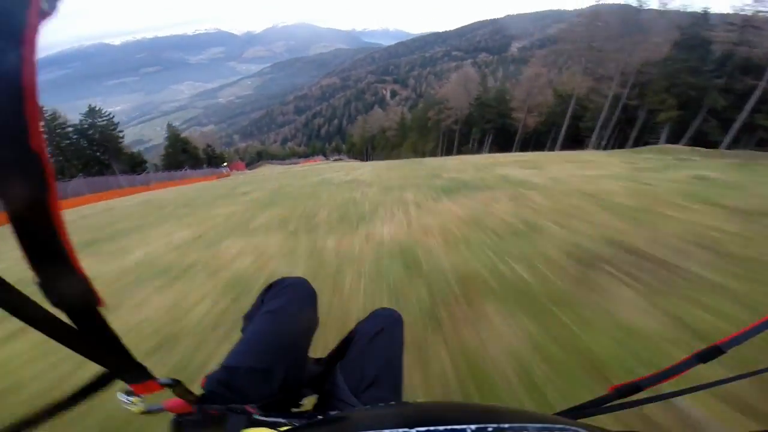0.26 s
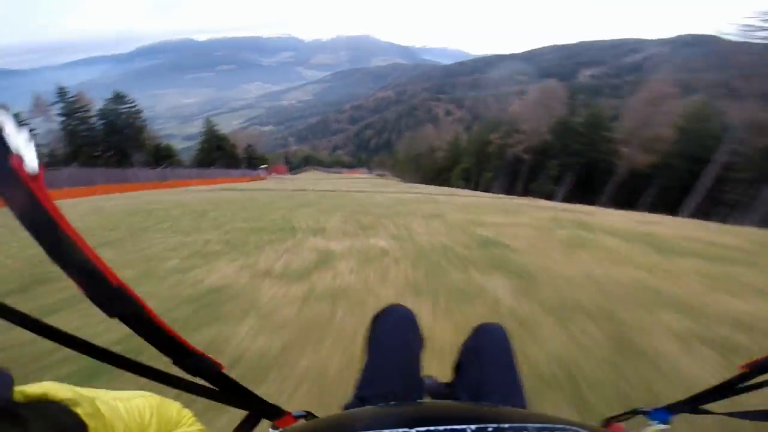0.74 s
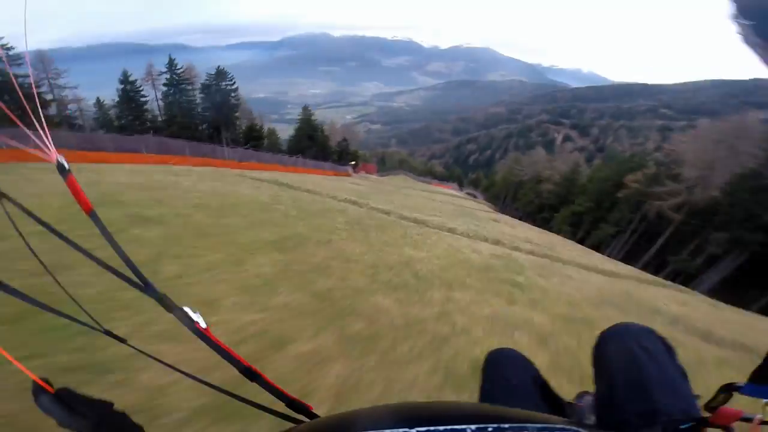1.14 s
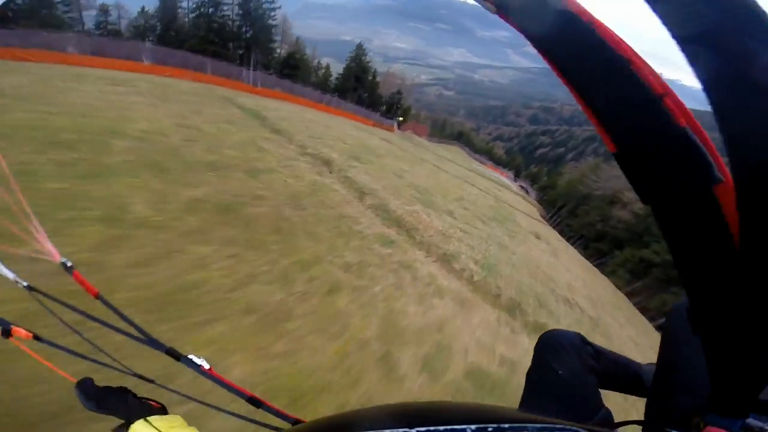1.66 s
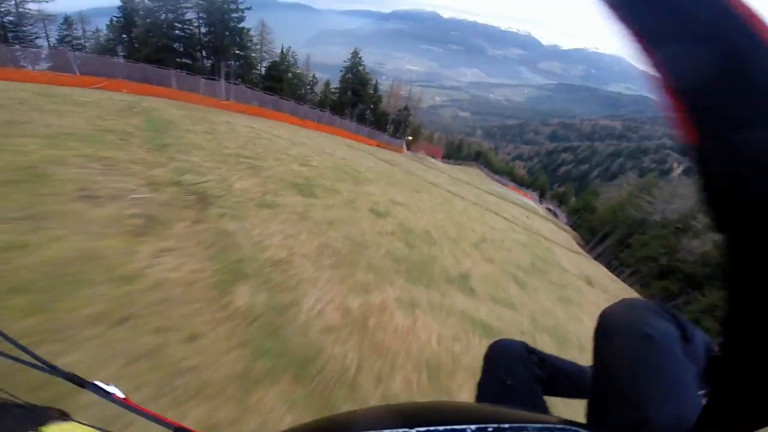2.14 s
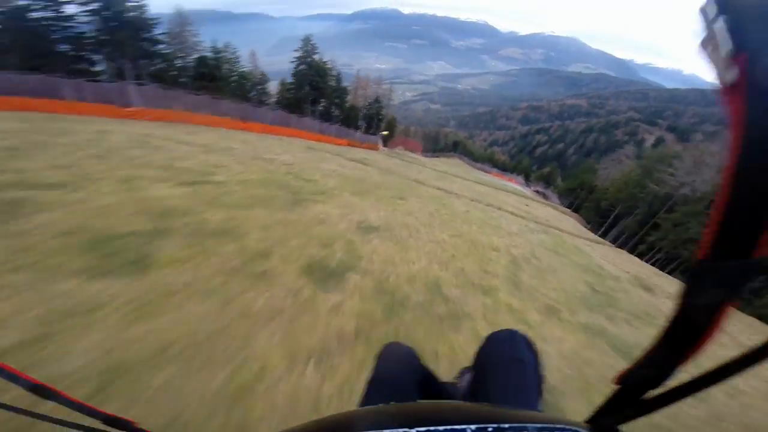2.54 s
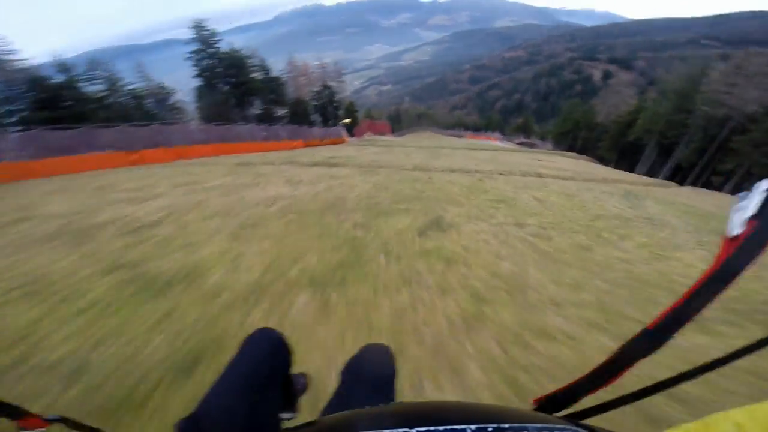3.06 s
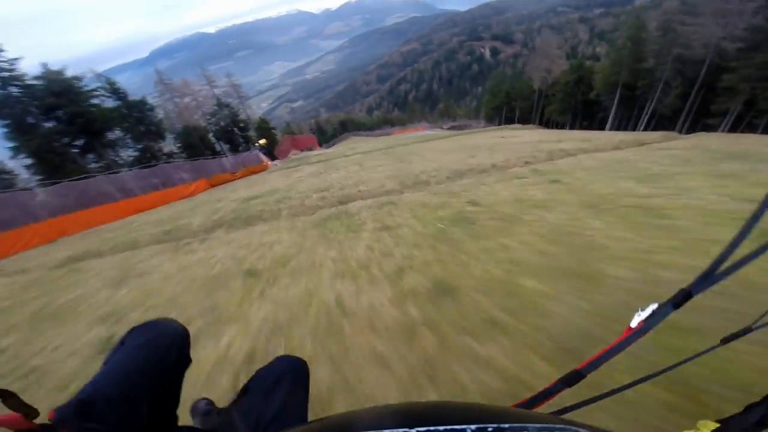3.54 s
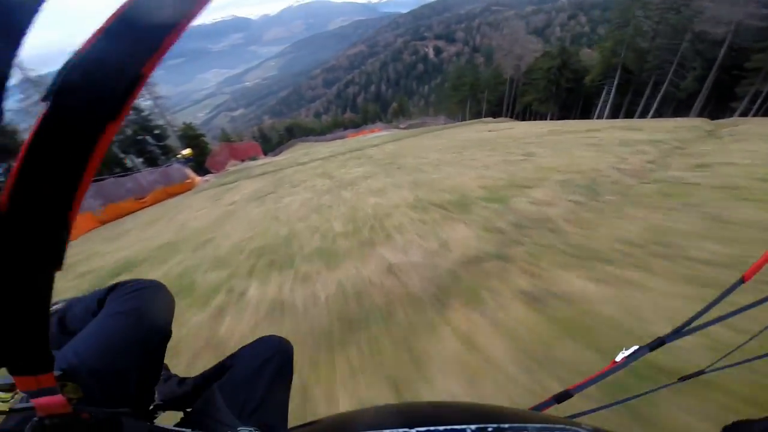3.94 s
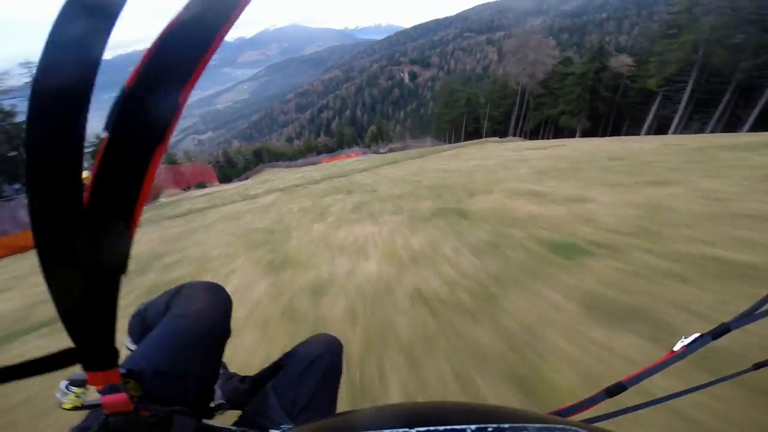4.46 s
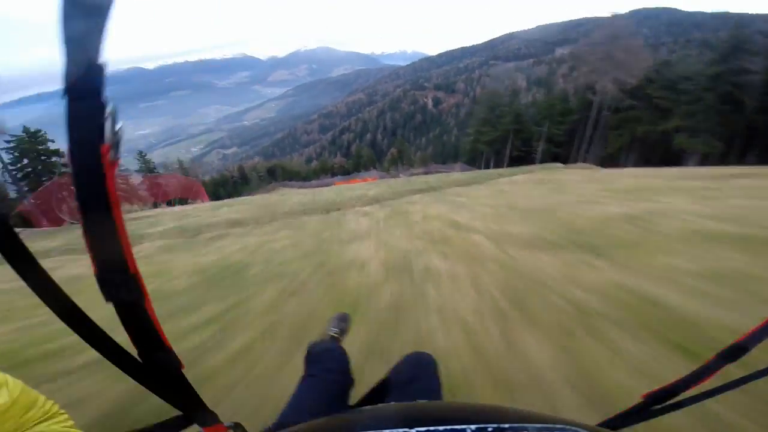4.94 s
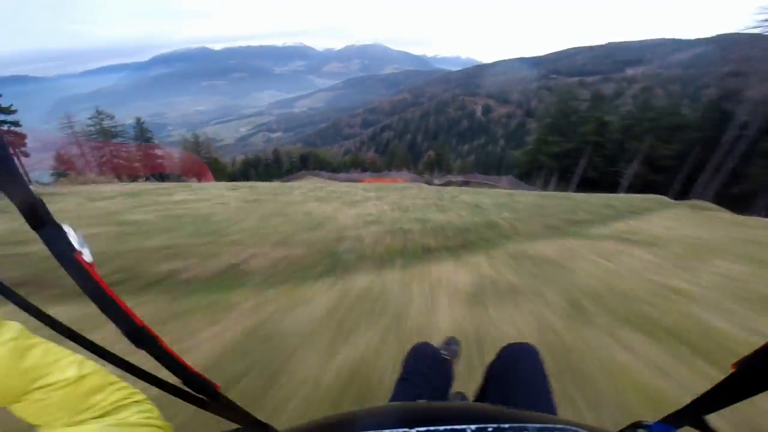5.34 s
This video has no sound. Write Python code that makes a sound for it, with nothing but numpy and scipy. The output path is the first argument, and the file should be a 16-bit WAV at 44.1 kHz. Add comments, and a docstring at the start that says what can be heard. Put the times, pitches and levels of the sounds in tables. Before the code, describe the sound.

Fast air tears across a small enclosed microphone during a low flight down an open meadow. The coarse, hollow, resonant roar drops, turns hissy, then surges back halfway, fluttering throughout. Soft low thuds of eddies lie beneath, a smooth hiss behind. Noisy whistles dip briefly at three moments and rigging ticks once. Very close mono sound, dull at the very top.

```python
"""A grass slope, skimmed fast and low under a wing with a small cased camera.
Turbulent air scrubs over the case: noise rung by the case's cavities, swelling and changing colour.
Slow eddies buffet the microphone membrane as three low noises; air hisses further off as smooth noise.
A gap whistles now and then, a noisy sliding tone, and a piece of rigging ticks once, a few struck modes."""
import sys
import numpy as np
from scipy import signal
from scipy.fft import rfft, irfft, next_fast_len
from scipy.io import wavfile

SR = 44100
rng = np.random.default_rng(int(sys.argv[2]) if len(sys.argv) > 2 else 0)


def inscribe(sig):
    """Save sig as 16-bit PCM at rate SR to the path in sys.argv[1].

    A 1-D sig is mono; a 2-D sig holds one channel per row.
    Samples are clipped to [-1, 1] before scaling.
    """
    pcm = np.round(np.clip(np.atleast_2d(sig).T, -1, 1) * 32767)
    wavfile.write(sys.argv[1], SR, pcm.astype(np.int16))


N = 246519   # samples, about 5.6 s


def from_db(db):
    """Amplitude factor of a level in dB."""
    return 10 ** (np.asarray(db) / 20)


def rms_one(x):
    """Scale to an RMS of one."""
    return x / np.sqrt(np.mean(x ** 2) + 1e-20)


def in_time(rows):
    """Draw each column of a table as a smooth fader move over the time in its first column."""
    seconds, *columns = np.transpose(rows)
    return [np.interp(np.arange(N) / SR, seconds, column) for column in columns]


def drift(corner_hz):
    """Slow chance: noise at every 20th sample through a double one-pole low-pass; spread 1."""
    pole = np.exp(-40 * np.pi * corner_hz / SR)
    noise = rng.standard_normal(N // 20 + 4002)
    slow = signal.lfilter([1], [1, -2 * pole, pole * pole], noise)[4000:]   # skip the settling
    return np.interp(np.arange(N) / 20, np.arange(len(slow)), rms_one(slow - slow.mean()))


def log_hz():
    """Size of a padded transform and the log frequency of its every bin."""
    size = next_fast_len(N)
    return size, np.log(np.maximum(np.arange(size // 2 + 1) * SR / size, 1))


def coloured(spectrum):
    """Transform of a noise with the given spectrum, silent outside it."""
    size, at = log_hz()
    hz, level_db = np.transpose(spectrum)
    shape_db = np.interp(at, np.log(hz), level_db, left=-200, right=-200)
    return rfft(rng.standard_normal(size)) * from_db(shape_db)


def band_level(noise, low_hz, high_hz):
    """Strength of a noise within one band."""
    return np.std(signal.sosfilt(signal.butter(4, [low_hz, high_hz], "band", fs=SR, output="sos"), noise))


# Cavities and ports of the case. Each row: centre in Hz, width in Hz, lift in dB (negative is a notch).
CASE_RESONANCES = [(1349, 199, 13.5), (1493, 394, 7), (1976, 80, -5.5), (2284, 250, 3), (2522, 99, 7),
                   (2825, 380, -3.5), (3234, 470, 6), (3530, 725, 9), (4150, 224, -10), (4370, 200, 1),
                   (4770, 330, -5.5), (5567, 520, 12), (5770, 230, 2.5), (6536, 550, 9.5), (7460, 220, 5),
                   (8000, 250, 3), (8600, 560, -5), (11070, 420, 4.5)]


def through_case(x):
    """Cavities boost and cancel around their resonances: a chain of peaks and notches."""
    sections = []
    for hz, width_hz, lift_db in CASE_RESONANCES:
        a, w, damp = from_db(lift_db / 2), 2 * np.pi * hz / SR, np.pi * width_hz / SR
        zeros = [1 + damp * a, -2 * np.cos(w), 1 - damp * a]
        poles = [1 + damp / a, -2 * np.cos(w), 1 - damp / a]
        sections.append(np.array(zeros + poles) / poles[0])
    return signal.sosfilt(sections, x)


# Airflow over the case. Each row: time in seconds, level of the roar in dB, then its upper mids, treble
# and top hiss in dB relative to the roar; of these three only the swing about the mean is used.
AIRFLOW = [(0.0, -17.5, -5.5, -13, -32.0), (0.5, -16.5, -4.5, -12.5, -35), (0.68, -19.5, -3.5, -12, -33.0),
           (0.8, -25.0, 1.5, -8.5, -24.5), (1.25, -24.5, -1.5, -4.5, -21), (1.43, -26.5, 1, -3.5, -22.0),
           (1.6, -24.5, 1.5, -4.5, -21.5), (1.87, -22, -2.5, -10.5, -25.0), (1.92, -28, -3.5, -11.5, -32),
           (2.08, -25.5, -5.5, -9.5, -23), (2.15, -29, -3.5, -7.5, -26), (2.4, -22.5, -3.5, -5.5, -23),
           (2.5, -22.5, -5.5, -4.5, -26.5), (2.57, -14, -4.5, -13, -37.5), (2.9, -17.0, -3, -10, -28),
           (3.2, -15.5, -5, -11.5, -31.5), (3.45, -22, -3.5, -12, -27.0), (3.7, -16.5, -4, -10, -30.0),
           (3.85, -20.5, -2.5, -11, -27), (4.1, -18.0, -1.5, -8, -28.5), (4.6, -18.0, -4, -9, -31),
           (4.9, -21, 0.5, -6.5, -30.0), (5.13, -22.5, -10, -8.5, -28), (5.17, -26, -8, -8, -22.0),
           (5.31, -42, 4, 3.5, -13), (5.36, -18.5, -3, -6.5, -21), (5.59, -22.5, 0.5, -6.5, -21.5)]
# Centres of those four bands, in Hz.
AIRFLOW_BAND_HZ = [1450, 3100, 5900, 12000]
# Broad colour of the turbulence before the cavities. Each row: frequency in Hz, relative density in dB per Hz.
SCRUB_COLOUR = [(700, -22), (1000, -14), (1200, -5.5), (1900, 0.5), (2700, -4), (4200, -6.5), (5000, -10.5),
                (6900, -14), (7900, -21), (9500, -32), (10400, -26), (13400, -28.5), (14300, -42),
                (15300, -44), (16500, -45)]
FLUTTER_DB_PER_OCTAVE = 0.3063   # the flutter deepens above 1 kHz


def scrub(flutter, shared_db, fast_db, own_db):
    """Turbulence in overlapping bands; gusts and eddies shake all together, and each a little on its own."""
    size, at = log_hz()
    roar_db, *relative_db = in_time(AIRFLOW)
    # the spectra give the mean colour, the curves its swings
    swings_db = np.array([0 * roar_db] + [curve - curve.mean() for curve in relative_db])
    ringing = through_case(irfft(coloured(SCRUB_COLOUR), size))
    noise = rfft(ringing)
    noise /= band_level(irfft(noise, size), 1100, 2100)   # levelled in the roar band
    together_db = shared_db * drift(20.0) + fast_db * drift(124.0)

    centres, out = np.log(np.geomspace(1000, 14500, 13)), 0
    for k, centre in enumerate(centres):
        share = np.interp(at, centres, np.arange(len(centres)) == k)   # triangles that sum to one
        # blend the swings of the two nearest airflow bands
        place = np.interp(centre, np.log(AIRFLOW_BAND_HZ), np.arange(len(AIRFLOW_BAND_HZ)))
        low = min(int(place), len(AIRFLOW_BAND_HZ) - 2)
        level_db = swings_db[low] + (place - low) * (swings_db[low + 1] - swings_db[low])
        octaves = (centre - centres[0]) / np.log(2)
        level_db = level_db + FLUTTER_DB_PER_OCTAVE * octaves * flutter
        band = irfft(noise * share, size)[:N]
        out = out + band * from_db(level_db + together_db + own_db * drift(13.0))
    return from_db(roar_db) * out


# Slow eddies on the membrane. Each row: time in seconds, then thump, rumble and hollow mids in dB.
BUFFET_LEVELS = [(0.0, -31.0, -40, -40.5), (0.7, -31.5, -39, -46.0), (1.1, -29.5, -39.5, -43),
                 (1.45, -29, -41.5, -45), (1.62, -24, -35.5, -43), (1.77, -20.5, -32, -38),
                 (1.9, -30.5, -33.5, -42), (2.07, -17, -31.5, -38.5), (2.2, -28.5, -36.5, -44),
                 (2.45, -26.5, -32.5, -41.5), (2.65, -33, -37.5, -43.0), (2.8, -26, -34.5, -39.5),
                 (3.25, -32, -42, -45.5), (3.9, -31.5, -40, -43.5), (4.5, -34, -38.5, -43),
                 (4.65, -31.5, -37.5, -41.5), (4.85, -28.5, -33.5, -40), (5.12, -32, -41.5, -49.5),
                 (5.42, -24.5, -30, -39), (5.59, -28, -38.5, -42.5)]
# Colours of the three layers. Each row: frequency in Hz, relative density in dB per Hz.
THUMP_COLOUR = [(12, -42), (20, -12.5), (65, -7.5), (113, -1), (130, -0.5), (162, -11), (190, -24),
                (250, -41), (420, -120)]
RUMBLE_COLOUR = [(88, -33), (150, -15), (178, -4.5), (361, -4.5), (470, -14.5), (610, -24), (1030, -120)]
HOLLOW_COLOUR = [(380, -9.5), (480, -5), (650, -4), (900, -6.5), (1100, -4), (1400, -43)]


def buffet(lumpy_db):
    """Eddies push on the membrane: three low noise layers, each swelling as the eddies pass."""
    size, out = log_hz()[0], 0
    for colour, level_db in zip([THUMP_COLOUR, RUMBLE_COLOUR, HOLLOW_COLOUR], in_time(BUFFET_LEVELS)):
        layer = rms_one(irfft(coloured(colour), size)[:N])
        out = out + from_db(level_db + lumpy_db * drift(16.0)) * layer
    return out


# Steadier hiss on lines and clothing. Each row: time in seconds, level of its 9 kHz hump in dB.
AIR_LEVELS = [(0.0, -47.0), (0.35, -49), (0.7, -45), (1.45, -44.5), (1.7, -41.0), (1.92, -43.5), (2.5, -42),
              (2.6, -46.5), (3.2, -45), (3.55, -42.5), (3.8, -47), (4.1, -42.5), (4.9, -47), (5.2, -42.5),
              (5.4, -37), (5.59, -39.5)]
# Its colour. Each row: frequency in Hz, relative density in dB per Hz.
AIR_COLOUR = [(900, 7.5), (1500, 13.5), (2600, 15), (4500, -1.5), (7000, 3), (8000, -4), (8500, 6),
              (9500, 2), (10200, -6.5), (11100, -11), (12500, -21), (15100, -21)]


def air(flutter, flutter_db, flicker_db):
    """Air rushing past lines and clothing: smooth broad noise, levelled by its 9 kHz hump."""
    noise = irfft(coloured(AIR_COLOUR), log_hz()[0])[:N]
    noise /= band_level(noise, 8200, 9800)
    level_db = in_time(AIR_LEVELS)[0]
    return from_db(level_db + flutter_db * flutter + flicker_db * drift(20.0)) * noise


# Brief breathy whistles that slide down.
# Each row: start in seconds, length in seconds, first pitch in Hz, level in dB.
WHISTLES = [(0.622, .27, 7900, -36.5), (2.35, .22, 8000, -39.5), (4.871, .25, 6800, -33)]
SAG_HZ_PER_S2 = 23000   # the pitch falls ever faster
WHISTLE_EDGE_S = 0.033   # swell and fade


def whistle(breath_hz, waver_hz, overtone_db):
    """An unsteady edge tone: a narrow band of noise riding the pitch, with a faint overtone."""
    hz, gain = np.zeros(N), np.zeros(N)
    for start, length, first_hz, level_db in WHISTLES:
        t = np.arange(N) / SR - start
        envelope = np.clip(np.minimum(t, length - t) / WHISTLE_EDGE_S, 0, 1)
        hz += (envelope > 0) * (first_hz - SAG_HZ_PER_S2 * t ** 2)
        gain += from_db(level_db) * envelope
    phase = 2 * np.pi * np.cumsum(hz + waver_hz * drift(35.0)) / SR
    breath = drift(breath_hz) + 1j * drift(breath_hz)
    tone = np.exp(1j * phase) + from_db(overtone_db) * np.exp(2j * phase)
    return gain * np.real(breath * tone)


# Contact and two duller rebounds.
# Each row: time in seconds, strike level in dB, tilt in dB per octave above 3 kHz.
TICK_CONTACTS = [(2.1011, -6, -1), (2.1046, -9, -12), (2.1062, -11, -15)]
# What the tick rings with. Each row: frequency in Hz, relative level in dB, 60 dB decay time in seconds.
TICK_MODES = [(1240, -3.5, 0.016), (1910, -9, 0.011), (2440, -4, 0.015), (3040, -6, 0.013),
              (3480, -7, 0.0089), (4860, -6.5, 0.0084), (7000, -14, .006)]


def tick(soft_hz):
    """Each contact strikes every mode with its own strength; the case lets through no lows and few highs."""
    out = np.zeros(N)
    luck = rng.normal(0, 1.9, (len(TICK_CONTACTS), len(TICK_MODES)))   # dB
    for k, (hz, mode_db, t60) in enumerate(TICK_MODES):
        clicks = np.full(N, 1e-18)   # a trace of input keeps the decay from stalling the filter
        octaves = max(np.log2(hz / 3000), 0)
        for (seconds, strike_db, tilt_db), luck_db in zip(TICK_CONTACTS, luck[:, k]):
            clicks[round(seconds * SR)] = from_db(strike_db + mode_db + luck_db + tilt_db * octaves)
        r, w = from_db(-60 / (t60 * SR)), 2 * np.pi * hz / SR
        ring = signal.lfilter([0, np.sin(w)], [1, -2 * r * np.cos(w), r * r], clicks)
        out += (-1) ** k * ring   # neighbouring modes in opposite phase
    return signal.sosfilt(signal.butter(3, [1000, soft_hz], "band", fs=SR, output="sos"), out)


def scene():
    """All sources meet at one microphone."""
    flutter = drift(45)   # quick eddies that shake the treble and the far hiss alike
    wind = scrub(flutter, shared_db=0.69, fast_db=0.68, own_db=0.5)
    wind = wind + buffet(lumpy_db=0.7)
    wind = wind + air(flutter, flutter_db=0.7, flicker_db=0.74)
    tones = whistle(breath_hz=220, waver_hz=130, overtone_db=-35)
    return (wind + tones + tick(soft_hz=7500))[None, :]


CUTOFF_HZ = 15120


def record(dry):
    """Peaks are rounded a little, then a steep low-pass cuts the top."""
    rounded = 1.5 * np.tanh(dry / 1.5)
    return signal.sosfilt(signal.ellip(12, 0.3, 80, CUTOFF_HZ, fs=SR, output="sos"), rounded)


dry = scene()
out = record(dry)
inscribe(out)
```